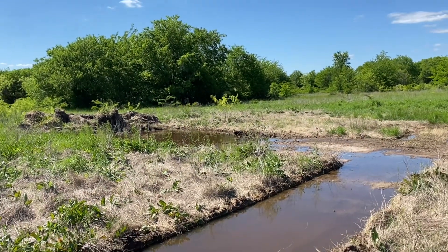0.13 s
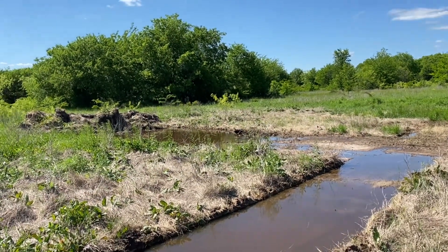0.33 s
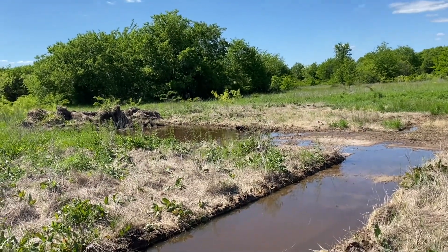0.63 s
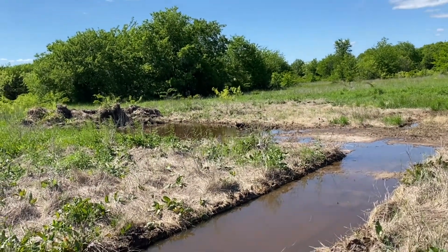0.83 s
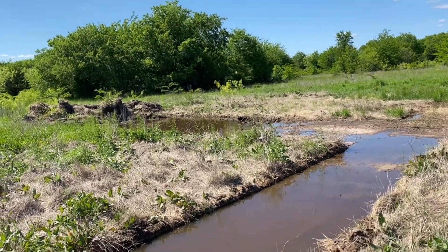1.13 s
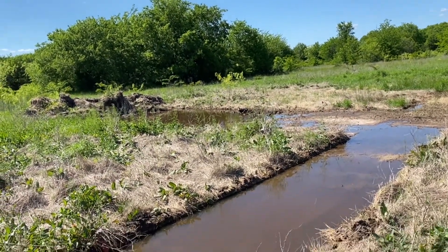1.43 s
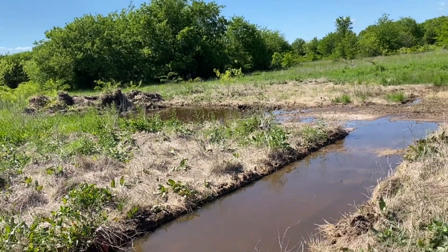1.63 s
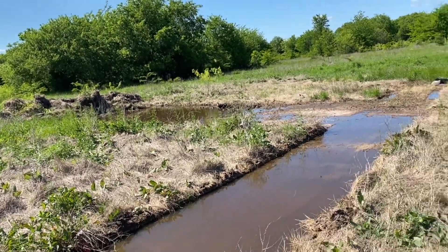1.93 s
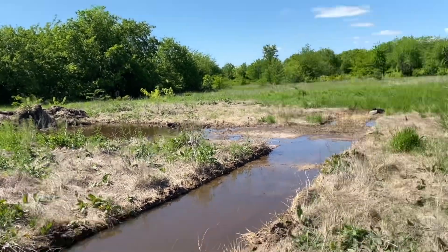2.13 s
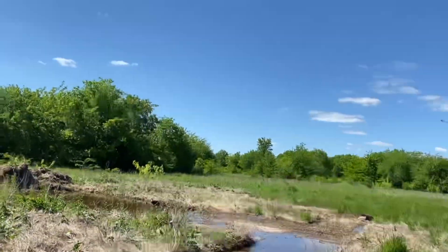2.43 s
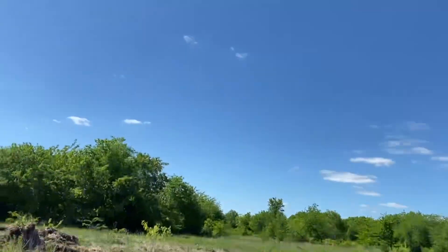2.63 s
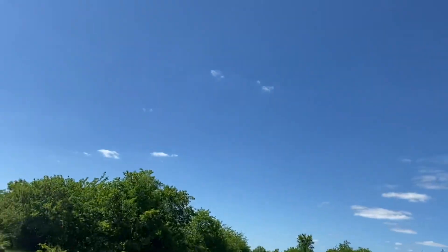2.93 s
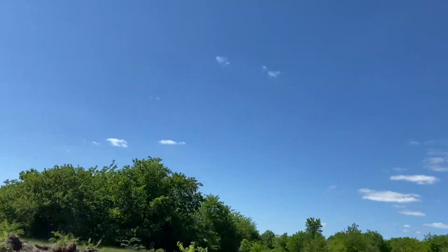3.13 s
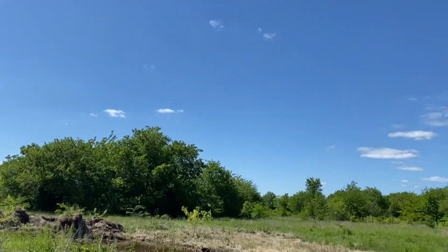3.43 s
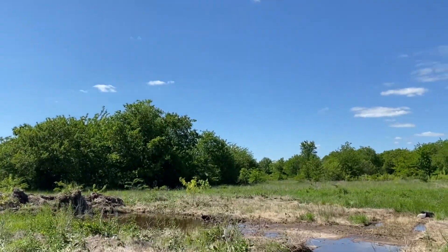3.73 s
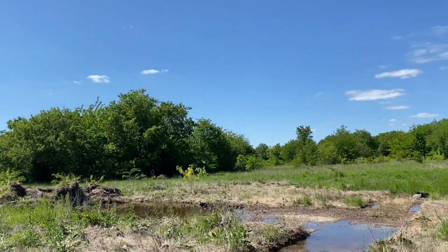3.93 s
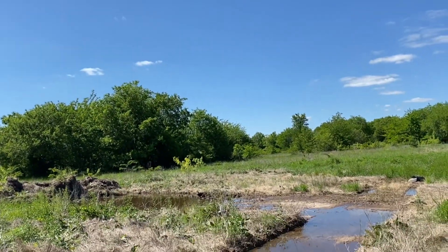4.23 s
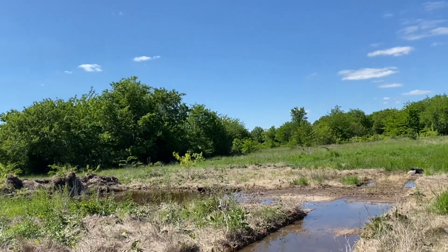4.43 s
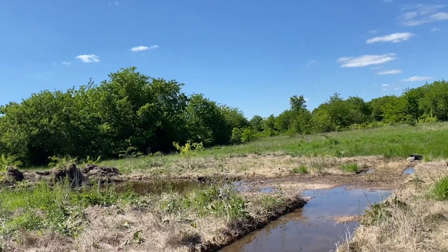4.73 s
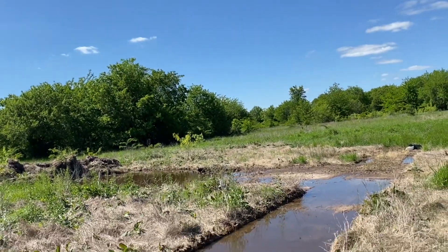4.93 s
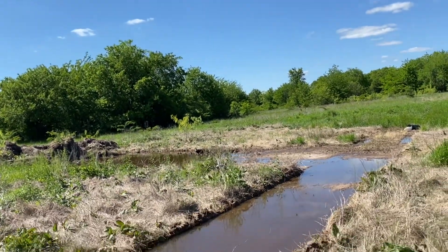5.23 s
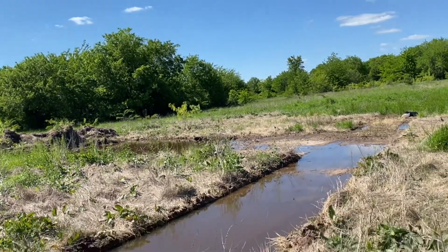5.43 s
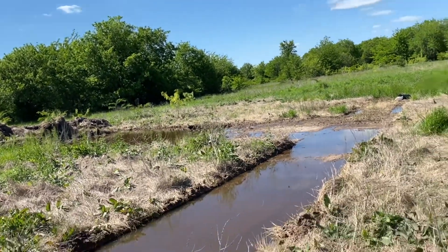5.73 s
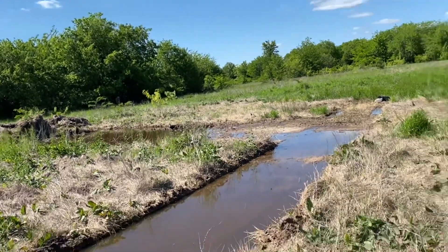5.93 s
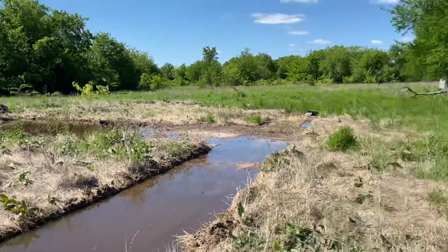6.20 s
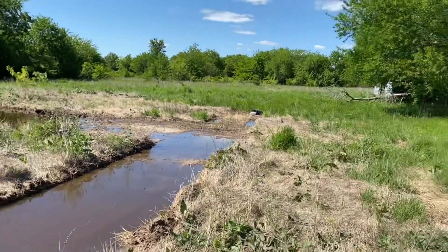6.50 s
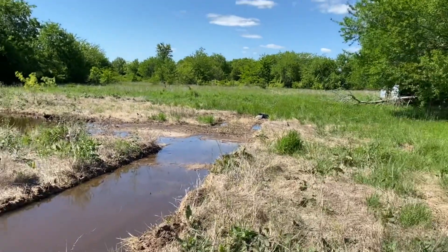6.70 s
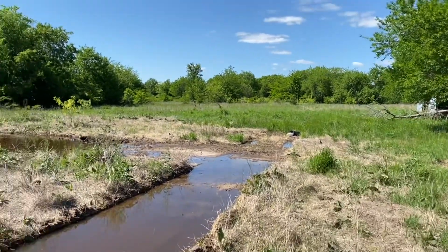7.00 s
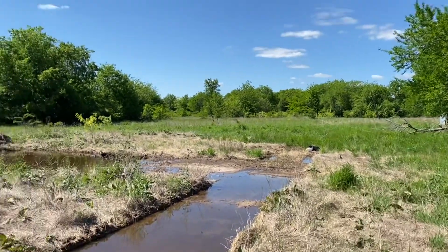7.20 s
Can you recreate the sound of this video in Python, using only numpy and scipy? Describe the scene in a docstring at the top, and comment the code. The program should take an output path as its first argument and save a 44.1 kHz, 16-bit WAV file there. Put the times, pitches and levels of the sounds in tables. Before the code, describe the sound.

Outdoors by a flooded ditch in an open field, a near small frog gives short, rising, ratchety creaks about every 0.4 seconds, answered by fainter and lower frogs. Wind rumbles and thumps softly on a handheld stereo microphone, strongest from about 1.3 to 2.3 seconds. From about 4.8 seconds dry grass rustles, a shoe scuffs, and stalks snap sharply, loudest near 6.6 seconds.

```python
"""Small frogs' creaks are heard first: comb-like pulse runs that quicken and climb, in several voices.
Each pulse rings the vocal sac as decaying sines; water and banks return the calls.
Wind is lumpy shaped noise with sinking sine buffets; the field hisses and a far insect buzzes thinly.
Dry grass rustles as shaped noise and snaps under the walker: noise cracks over sine knocks; a shoe scuffs."""
import sys
import numpy as np
from scipy import signal
from scipy.fft import rfft, irfft
from scipy.io import wavfile
from scipy.ndimage import uniform_filter1d

SR = 44100
rng = np.random.default_rng(int(sys.argv[2]) if len(sys.argv) > 2 else 0)


def inscribe(sig):
    """Save sig as 16-bit PCM at rate SR to the path in sys.argv[1].

    A 1-D sig is mono; a 2-D sig holds one channel per row.
    Samples are clipped to [-1, 1] before scaling.
    """
    pcm = np.round(np.clip(np.atleast_2d(sig).T, -1, 1) * 32767)
    wavfile.write(sys.argv[1], SR, pcm.astype(np.int16))


N = 324576

# phase lead of the left microphone port: frequency_hz, lead_radians
PORT_PHASE = [(0, 0), (4000, .5), (7700, -.6), (16500, -12.6)]


def amp(db):
    """Turn decibels into a gain."""
    return 10 ** (np.asarray(db) / 20)


def pan(left_right_db):
    """Left and right gains this many decibels apart; positive leans left."""
    return amp([[left_right_db / 2], [-left_right_db / 2]])


def evened(x):
    """Scale to an RMS of one."""
    return x / np.sqrt(np.mean(x ** 2) + 1e-20)


def read_spectrum(points, hz):
    """Read a colour in dB along log frequency, 20 dB lower outside its ends."""
    point_hz, point_db = np.transpose(points)
    return np.interp(np.log(hz + 1), np.log(point_hz + 1), point_db, left=point_db[0] - 20, right=point_db[-1] - 20)


def curve(rows, column):
    """Draw one column of a timed table as straight lines over the scene."""
    rows = np.array(rows)
    return np.interp(np.arange(N) / SR, rows[:, 0], rows[:, column])


def add(mix, start_s, sound, left_right_db):
    """Place a panned sound in the mix, trimmed at both ends of the scene."""
    at = round(start_s * SR)
    part = mix[:, max(at, 0):max(at + sound.shape[-1], 0)]
    panned = sound * pan(left_right_db)
    part += panned[:, max(-at, 0):][:, :part.shape[1]]


def noise(spectrum, size, flicker_db, patchy_db):
    """Stereo noise of a given colour and unit RMS, with flicker common to all bins and drifting patches."""
    # likeness of the two channels: frequency_hz, left_right_likeness (0 to 1)
    likeness = [(60, 0.7), (120, 0.7), (240, 0.82), (480, 0.7), (950, .2), (1900, 0.8), (3800, 0.3),
                (7500, 0.72), (15000, .85)]
    frames, hz = 4 * N // size + 5, np.fft.rfftfreq(size, 1 / SR)
    a, b, c, d, patches = rng.standard_normal((frames, len(hz), 5)).T
    flicker = evened(uniform_filter1d(patches[0], size=3))
    patches = uniform_filter1d(uniform_filter1d(patches, size=4, axis=0), size=6, axis=1)
    patches = evened(patches)
    likeness_hz, share = np.transpose(likeness)
    same = np.interp(np.log(hz + 1), np.log(likeness_hz), share)[:, None]
    left = a + 1j * b
    right = same * left + np.sqrt(1 - same ** 2) * (c + 1j * d)
    right *= np.exp(-1j * np.interp(hz, *np.transpose(PORT_PHASE)))[:, None]
    colour_db = read_spectrum(spectrum, hz)[:, None] + flicker_db * flicker + patchy_db * patches
    bins = np.array([left, right]) * amp(colour_db)
    return evened(signal.istft(bins, nperseg=size, noverlap=3 * size // 4)[1][:, :N])


def sac_ring(ring_hz, decay_ms, linger_share, lead_ms, flap):
    """One mode of the vocal sac: a sine with a soft swell, quick fade and slower lingering ring."""
    t_ms = 1000 * np.arange(800) / SR
    late_ms = np.maximum(t_ms - np.array([[0], [lead_ms]]), 0)  # the right channel comes later
    u = late_ms / decay_ms
    burst = (u / 3) ** 3 * np.exp(3 - u)
    linger = linger_share * u ** 4 / (u ** 4 + 256) * np.exp(-late_ms / 2.02) * flap  # 2.02 ms decay
    return (burst + linger) * np.sin(2 * np.pi * ring_hz * late_ms / 1000)


def call(last_s, pulses, quick, level_db, upper_hz, voice):
    """A pulse train counted back from its end: earlier gaps are longer, earlier pitch is lower."""
    # rings of the vocal sac: multiple of the upper ring, pitch_glide_share, level_db, decay_ms,
    # linger_share, share of the call's left-right, left_bias_db, left_lead_ms
    sac = [(0.526, 0.01, -1, 0.46, .12, 0.2, -3.5, 0.0084),
           (0.74, 0.055, -16.5, 0.29, 0.25, 0.57, 3.5, 0.0068), (1, 0.086, 2, 0.5, 0.66, 0.46, 2.5, 0.066),
           (1.16, 0.062, -13, 0.36, 1, 0.53, 0.5, 0.092), (1.529, 0.17, -16.5, 0.36, 0.15, 3.7, 6, 0.067),
           (1.9, 0.025, -33.5, 0.45, 0.22, 2.3, 3, 0.13), (2.12, 0.08, -40.5, 0.4, 0.23, 2.7, -0.5, 0.03),
           (2.54, 0.03, -39.5, 0.4, 0.26, 2.3, 3.5, 0.044)]
    swell_fall_db, swell_bend, peak_at, last_dip_db = -22, 1.4, 0.3, -12  # peak_at: share before the end
    climb_s, climb_bend = 0.14, 1.2  # time scale of the climb; its levelling off
    gap_ms, slow, spread, lower_db, side_db, top_db, left_right_db, ring, climb, swell, closing_db = voice
    back = np.arange(24)
    gaps_s = gap_ms * (1 + slow / (1 + np.exp((quick - back) / spread))) / 1000
    # seconds before the last full pulse; entry 0 is the closing pulse, one gap after it
    before_s = np.append(-gaps_s[0], np.cumsum(gaps_s) - gaps_s)
    length_s = before_s[round(pulses)]
    chance = rng.standard_normal((25, 2 + len(sac)))
    colour_db = 2 * rng.standard_normal((25, len(sac)))  # each ring's strength varies between pulses
    flap = 1 + 0.23 * evened(uniform_filter1d(rng.standard_normal((25, 800)), size=30))  # uneven skin
    out = np.zeros((2, round((length_s + .04) * SR)))
    for k in range(round(pulses) + 1):
        early = max(before_s[k] / max(length_s, 1 / SR), 0)  # 0 at the end of the call, 1 at its start
        rise_db = swell * swell_fall_db * max(early - peak_at, 0) ** swell_bend
        pulse_db = level_db + rise_db + last_dip_db * max(peak_at - early, 0) + 0.8 * chance[k, 0]
        ring_length = ring * (1 - 0.35 * early)  # the first pulses ring shorter
        climbed = climb * (.15 - abs(before_s[k] / climb_s) ** climb_bend)
        peak_s = .003 + length_s - before_s[k] + .0001 * chance[k, 1]
        for row, wobble, tint_db in zip(sac, chance[k, 2:], colour_db[k]):
            multiple, glide, ring_db, decay_ms, linger_share, side, bias_db, lead_ms = row
            ring_hz = multiple * upper_hz * (1 + glide * climbed + 0.0058 * wobble)
            tone = sac_ring(ring_hz, decay_ms * ring_length, linger_share, lead_ms, flap[k])
            shade_db = 0
            if multiple < 2 / 3:
                shade_db = lower_db
            elif multiple < 4 / 5:
                shade_db = 6.5 * early  # the first pulses fill the gap between the two main rings
            elif multiple > 4 / 3:
                shade_db = top_db - early  # and their top rings are weaker
            elif multiple > 21 / 20:
                shade_db = side_db
            if k == 0:  # the closing pulse is dull
                shade_db += closing_db * (1 if multiple < 2 / 3 else 2)
            if multiple != 1:
                shade_db += tint_db
            gain = amp(pulse_db + ring_db + shade_db)
            add(out, peak_s - .0013 * ring_length, gain * tone, side * left_right_db + bias_db)
    return last_s - length_s - .003, out


def banks(x, t60, far_t60, far_db):
    """Scattered returns from near and far banks, water and grass: fading random taps, new for each call."""
    t = np.arange(10000) / SR
    fade = amp(-60 * t / t60) + amp(far_db - 60 * t / far_t60)
    taps = rng.standard_normal((2, len(t))) * fade * np.minimum(t / 0.004, 1)
    taps /= np.sqrt((taps ** 2).sum(1, keepdims=True))
    return signal.fftconvolve(x, taps, axes=1)


def frogs():
    """Every frog call, heard directly, thrown back once by the water and scattered by the banks."""
    # each kind of call, as voiced and placed ("low" and "plain" may be one frog):
    # quick_gap_ms, slow gaps longer by share, pulses the quickening takes,
    # lower_ring_db, side_ring_db, top_rings_db, left_right_db, ring length factor, climb factor,
    # share of the swell, closing_pulse_db, bank_echo_db
    voices = {"near": (7.75, .63, 1.5, -4, 0, 0, -0.5, 1.25, 0.85, .95, -7, -16),
              "low": (7.25, .7, 2.8, -8, 7, -2, 4.5, 0.7, 1.7, .4, -25, -11),
              "plain": (7.25, .7, 2.8, -13, 6, -5, 4.5, 1.15, 0.9, 1, -30, -12),
              "far": (8.5, .52, 1.5, -8, 6, -1, 5.5, .95, 1.3, .6, -12, -7),
              "thin": (7.9, .62, 1.5, -17, 1, -4, 1.5, 1.35, 1.3, .9, -6, -9),
              "faint": (8.5, .52, 1.5, -25.5, 0, 0, -2.5, 1, 0.1, .6, -20, -6)}
    # croaks: last_full_pulse_s, pulse count, quick pulses at the end, level_db, upper_ring_hz, kind of call
    croaks = [(0.016, 12, 9.8, -36.5, 3040, "near"), (0.2218, 15, 7.3, -49.5, 3140, "far"),
              (0.268, 8, 4, -53, 3330, "faint"), (0.2413, 7, 3.7, -47, 2370, "low"),
              (0.256, 1, 1.7, -46, 1970, "low"), (0.3985, 13, 5.4, -34.5, 3016, "near"),
              (0.7148, 13, 4.2, -48, 3120, "far"), (0.8502, 13, 5.44, -32, 2980, "near"),
              (0.8956, 7, 5, -43.5, 2530, "plain"), (1.1781, 14, 6.4, -48, 3200, "far"),
              (1.2995, 12, 4.1, -29.5, 2990, "near"), (1.394, 10, 3, -55.5, 3320, "faint"),
              (1.637, 14, 5.5, -46.5, 3170, "far"), (1.677, 13, 5.6, -31, 3005, "near"),
              (1.951, 11, 0.42, -55.5, 3270, "faint"), (2.0425, 12, 5.15, -33, 2966, "near"),
              (2.2666, 14, 4.6, -42.5, 3200, "thin"), (2.4218, 12, 4.56, -34.5, 3015, "near"),
              (2.551, 10, 1.64, -59, 3270, "faint"), (2.7789, 12, 5.4, -34, 3054, "near"),
              (3.0953, 8, 6.3, -42, 2660, "low"), (3.104, 16, 8.5, -46.5, 3270, "far"),
              (3.2268, 12, 4.57, -34.5, 3037, "near"), (3.5079, 8, 4.1, -40, 2730, "low"),
              (3.605, 13, 4.7, -46, 3300, "far"), (3.6558, 12, 5, -33.5, 3000, "near"),
              (3.733, 8, 2.5, -59.5, 3340, "faint"), (3.9418, 10, 4.7, -40, 2720, "low"),
              (4.0727, 12, 4.72, -33.5, 3020, "near"), (4.2996, 13, 6.9, -46, 3270, "thin"),
              (4.4454, 12, 4.34, -33, 3000, "near"), (4.753, 12, 4.1, -49, 3160, "far"),
              (4.877, 12, 4.75, -34.5, 3050, "near"), (4.907, 10, 6.8, -39.5, 2750, "low"),
              (5.2201, 12, 4.8, -35.5, 3040, "near"), (5.4702, 14, 6.8, -40, 2690, "plain"),
              (5.6277, 13, 5.7, -34, 3050, "near"), (5.7146, 10, 8.1, -47, 3220, "faint"),
              (5.8847, 13, 6.4, -40.5, 2710, "plain"), (6.0353, 13, 6.1, -36, 3050, "near"),
              (6.235, 11, 4.8, -44.5, 3110, "thin"), (6.391, 14, 5.6, -34.5, 2664, "plain"),
              (6.402, 12, 3.3, -39, 3050, "near"), (6.569, 12, 1.8, -54, 3350, "faint"),
              (6.757, 12, 4.6, -38.5, 2950, "near"), (7.01, 14, 5.8, -36.5, 2730, "plain"),
              (7.1585, 12, 4.4, -34, 2947, "near"), (7.4069, 12, 5.3, -37.5, 2820, "plain")]
    # the microphone turns: time_s, upper_over_lower_rings_db, left_right_shift_db
    turn = [(0.0, -5, -0.5), (1.4, 1, -2.5), (2.401, -4.5, -2), (4.001, -2.5, -1.5), (5.3, -2.5, 0.5),
            (6.0, -3, -4.5), (6.5, -2, 2.5), (7.36, -3.5, -2)]
    out = np.zeros((2, N))
    turn_s, upper_db, shift_db = np.transpose(turn)
    for last_s, pulses, quick, level_db, upper_hz, kind in croaks:
        *voice, echo_db = voices[kind]
        voice[3] -= np.interp(last_s, turn_s, upper_db)  # lower ring
        voice[6] += np.interp(last_s, turn_s, shift_db)  # left-right
        start_s, sound = call(last_s, pulses, quick, level_db, upper_hz, voice)
        add(out, start_s, sound, 0)
        add(out, start_s + 0.0042, amp(-13.5) * sound, 0)  # the water surface
        add(out, start_s, amp(echo_db) * banks(sound, t60=0.035, far_t60=0.34, far_db=-19), 0)
    return out


def buffet(pitch_hz, edge_db, turn):
    """An eddy at the ports: a swelling, sinking sine, with a sharper edge that is strongest early."""
    u = np.linspace(0, 1, round(2.6 / pitch_hz * SR))  # lasts 2.6 periods of the middle pitch
    shape = np.sin(np.pi * u) ** 2
    sink = 2 ** (1.8 * (.5 - u))  # falls 1.8 octaves
    apart = np.array([[0], [0.51 * (turn[1] - .5)]])  # the eddy reaches the ports in different phase
    wobble = np.sin(2 * np.pi * (np.cumsum(pitch_hz * sink) / SR + turn[0] + apart))
    edge_cycles = np.cumsum(600 * sink ** 0.36) / SR + turn[2] + apart
    edge = 3.6 * shape ** 2 * (1 - u) ** 3 * np.sin(2 * np.pi * edge_cycles)
    return shape * (wobble + amp(edge_db) * edge * pan(7))


def wind():
    """Wind pressure at the ports: lumpy rumble, brighter flutter and short buffets, softly flattened."""
    # wind at the ports: time_s, rumble_db, flutter_db
    gusts = [(0.0, -37.5, -52), (0.04, -32.5, -42), (0.2, -53, -85), (0.24, -41.5, -43.5),
             (0.37, -49.5, -65.5), (0.41, -35.5, -48.5), (0.69, -44.5, -65), (0.76, -35, -51),
             (0.86, -55, -59.5), (0.92, -32, -40.5), (1.11, -50, -74), (1.15, -33.5, -53),
             (1.19, -41.5, -63.5), (1.27, -42, -49.5), (1.3, -39, -45.5), (1.33, -30, -27),
             (1.35, -32, -57), (1.45, -32, -49), (1.5, -47, -70), (1.54, -37, -41), (1.6, -46.5, -75),
             (1.64, -31.5, -34), (1.7, -35.5, -41), (1.8, -34.5, -30.5), (1.92, -37, -43.5),
             (2.03, -35, -38), (2.09, -28, -30.5), (2.46, -45, -61.5), (2.58, -35.5, -49.5),
             (2.64, -58.5, -76), (2.73, -42, -73), (2.93, -74, -81), (3.24, -42.5, -58.5), (3.34, -32, -41),
             (3.46, -45.5, -67), (3.52, -42, -39.5), (3.61, -28.5, -37), (3.65, -43.5, -49.5),
             (3.81, -32, -30.5), (3.85, -32.5, -38.5), (4.06, -41, -58.5), (4.16, -30.5, -50.5),
             (4.28, -60, -84), (4.39, -38, -60), (4.65, -47, -62), (4.73, -36, -45), (4.84, -40, -52),
             (5.31, -45.5, -64), (5.35, -34.5, -46.5), (5.41, -53, -68), (5.74, -47.5, -52),
             (5.84, -56, -100), (6.11, -43.5, -53.5), (6.13, -41, -63), (6.52, -67.5, -63.5),
             (6.66, -33, -45), (6.72, -36.5, -66), (6.79, -47.5, -46.5), (6.87, -36, -60), (6.91, -45, -64),
             (6.95, -35, -43), (6.97, -40, -70), (7.01, -64, -68.5), (7.36, -43.5, -58.5)]
    # colours of the two noises: frequency_hz, level_db per Hz (relative)
    rumble, flutter = [(8.8, -82.5), (22, -37.5), (44, 1.5), (70, 12), (210, -6.5), (326, -19), (368, -31),
                       (400, -29), (520, -61.5), (880, -120)], [(71, -38.5), (120, -10), (259, -1.5), (286, 1), (439, -8.5),
                                       (680, -25), (1090, -52), (1300, -58), (1690, -62.5), (2860, -120)]
    # single buffets: time_s, level_db, middle_pitch_hz, edge_gain_db
    buffets = [(0.238, -33.5, 213, -36), (0.481, -29.5, 193, -49), (0.949, -29, 158, -27),
               (1.135, -30.5, 193, -20), (1.286, -25, 253, -32), (1.324, -18, 260, -6),
               (1.392, -28.5, 208, -41), (1.446, -26, 226, -32), (1.631, -26.5, 244, -31),
               (1.649, -20, 302, -10), (1.674, -23.5, 262, -19), (1.769, -21.5, 371, -29),
               (1.801, -21, 198, -5.5), (1.891, -18, 400, 2), (2.079, -15, 234, -32),
               (2.141, -20.5, 217, -13), (2.181, -25.5, 298, -45), (2.263, -22.5, 181, -10.5),
               (3.283, -30, 270, -23), (3.331, -31, 243, -52), (3.517, -25, 216, -18),
               (3.56, -24, 400, -0.5), (3.591, -24, 184, -6.5), (3.708, -26, 234, -4.5),
               (3.738, -27, 239, -13), (3.768, -28, 260, -22), (3.812, -20.5, 416, -37),
               (3.897, -26.5, 194, -21), (4.149, -42, 115, -31), (4.721, -32.5, 256, -31),
               (5.031, -34.5, 250, -7.5), (5.336, -25.5, 151, -38), (6.09, -31, 151, -19),
               (6.649, -27, 117, -35), (6.771, -23.5, 197, -40), (6.943, -27.5, 178, -36)]
    lump_s, left_right_db, port_limit = 0.046, 1, 0.2
    lumps = rng.standard_normal(round(N / SR / lump_s) + 2)
    lumps_db = 2.5 * np.interp(np.arange(N) / SR / lump_s, np.arange(len(lumps)), lumps)
    out = amp(curve(gusts, 1) + lumps_db) * noise(rumble, size=2048, flicker_db=2.5, patchy_db=2.0)
    out += amp(curve(gusts, 2) + lumps_db) * noise(flutter, size=512, flicker_db=5.0, patchy_db=3.5)
    out *= pan(left_right_db)
    for (time_s, level_db, pitch_hz, edge_db), turn in zip(buffets, rng.random((len(buffets), 3))):
        add(out, time_s - 0.00407, amp(level_db) * buffet(pitch_hz, edge_db, turn), left_right_db)
    return port_limit * np.tanh(out / port_limit)  # the ports flatten the strongest pressure


def field_hiss():
    """The open field's faint, steady bed of shaped noise."""
    # colour of the field: frequency_hz, level_db per Hz (relative)
    colour = [(88, -37), (150, -20), (303, -37), (378, -13.5), (571, -3.5), (938, -7.5), (1370, -12.5),
              (2290, -18), (3010, -21.5), (3760, -22.5), (5290, -31), (7850, -35), (9000, -82),
              (11700, -103), (19800, -120)]
    return amp(-65) * noise(colour, size=1024, flicker_db=1.0, patchy_db=4.5)


def insect():
    """A far insect's thin buzz: a narrow band of noise that comes and goes."""
    # buzz: time_s, level_db
    buzz = [(0.0, -82), (1.9, -88), (2.09, -78), (2.7, -88.5), (4.7, -80.5), (4.9, -100)]
    # colour of the wings: frequency_hz, level_db per Hz (relative)
    wings = [(4900, -16.5), (5200, 6), (5350, -3), (5500, -12), (5800, -7.5)]
    return amp(curve(buzz, 1)) * noise(wings, size=512, flicker_db=1.4, patchy_db=.6)


def snap(knock_db, left_right_db):
    """A stalk breaking: a bright noise crack, panned less, over a short sine knock."""
    t = np.arange(500) / SR
    lag = np.exp(-1j * np.interp(np.fft.rfftfreq(len(t), 1 / SR), *np.transpose(PORT_PHASE)))
    grains = rng.uniform(-1, 1, (3, len(t)))
    crack = grains[0] + 0.9 * grains[1:]  # a shared part, and one differing between ports
    crack *= 1.6 * np.minimum(t / .0005, 1) * np.exp(-t / .0013)
    crack[1] = irfft(rfft(crack[1]) * lag, len(t))
    u = t / 0.00017
    knock = np.sin(2 * np.pi * 980 * rng.uniform(1.0, 1.01) * t) * u ** 2 * np.exp(2 - u) / 2
    return crack * pan(0.37 * left_right_db) + amp(knock_db) * knock * pan(left_right_db)


def grass():
    """Dry grass underfoot: crackly rustling noise, a shoe's duller scuff and snapping stalks."""
    # rustle of the grass and scuff of the shoe on the ground: time_s, level_db
    rustle, scuff = [(0.0, -78.5), (0.8, -87.5), (1.91, -86.5), (1.95, -65), (2.2, -69), (2.45, -74),
                     (2.6, -80), (3.42, -90), (3.46, -62), (3.56, -85.5), (4.2, -81.5), (4.77, -88),
                     (4.8, -58), (4.9, -52), (5.05, -58), (5.2, -53.5), (5.35, -53), (5.55, -59),
                     (5.72, -56), (5.9, -64), (5.94, -49.5), (6.02, -48), (6.12, -59), (6.27, -58),
                     (6.4, -65), (6.55, -54), (6.66, -51), (6.78, -56), (7.05, -71.5), (7.36, -63)], [(5.5, -100), (5.55, -69), (5.686, -47.5), (5.854, -58.5),
                                     (6.056, -56.5), (6.2, -90), (6.3, -100)]
    # their colours: frequency_hz, level_db per Hz (relative)
    blades, soil = [(300, 3), (700, 8.5), (1500, 11.5), (3500, 5), (6000, 4.5), (8000, -4.5), (11000, 1.5),
                    (15000, -2.5), (16000, -15)], [(150, -19), (400, -2.5), (800, -4), (1500, -4.5), (2500, -9),
                                   (4000, -13.5)]
    # stalks snapping: start_s, level_db, knock_gain_db, left_right_db
    snaps = [(2.0582, -53, -6, -9), (5.134, -51, 2, -15), (5.1628, -34.5, -8.5, -11), (5.6345, -50, 3, -5),
             (5.6494, -40.5, 0, -6), (5.6682, -51, -5, -4), (5.716, -41, -4, -5), (6.013, -29.5, -9, -7),
             (6.0614, -48.5, 12.5, -6), (6.096, -54, 19, -5), (6.24, -54.5, 10, -9),
             (6.5902, -24.5, -2.5, -8.5), (6.596, -23, -11.5, 1), (6.6191, -33, -0.5, -8),
             (6.6334, -45, -15, -2), (6.85, -56, -4, -11), (6.8988, -40.5, -4, -8), (7.056, -52, -22, -4),
             (7.276, -54, 4, -7)]
    out = amp(curve(rustle, 1)) * noise(blades, size=256, flicker_db=1.5, patchy_db=1.0)
    out += amp(curve(scuff, 1)) * noise(soil, size=256, flicker_db=2.5, patchy_db=3.0)
    for start_s, level_db, knock_db, left_right_db in snaps:
        add(out, start_s, amp(level_db) * snap(knock_db, left_right_db), 0)
    return out


def scene():
    """Sum the frogs, wind, field, insect and grass."""
    return frogs() + wind() + field_hiss() + insect() + grass()


def record(dry):
    """A 4 ms fade-in, then the recorder's band limit at 16.2 kHz."""
    faded = dry * np.minimum(np.arange(N) / (.004 * SR), 1)
    low_pass = signal.firwin(511, 16200, window=("kaiser", 9), fs=SR)
    return signal.oaconvolve(faded, low_pass[None], "same", axes=1)


dry = scene()
out = record(dry)
inscribe(out)
```